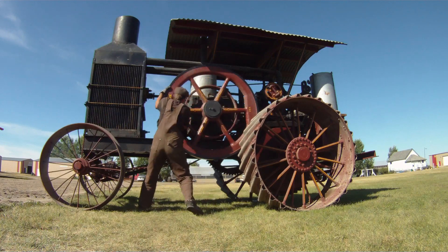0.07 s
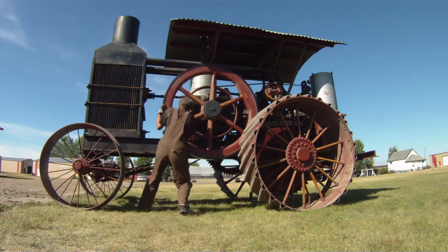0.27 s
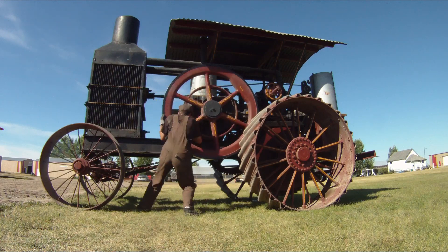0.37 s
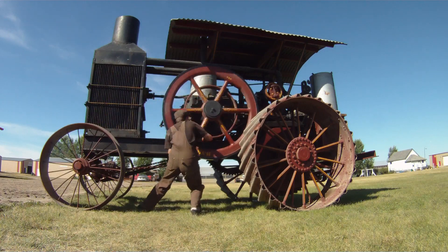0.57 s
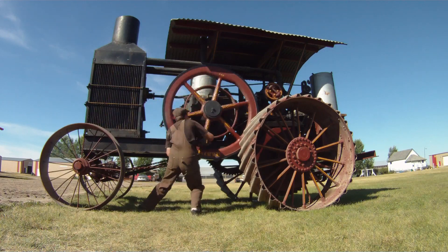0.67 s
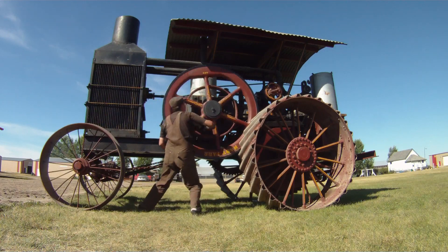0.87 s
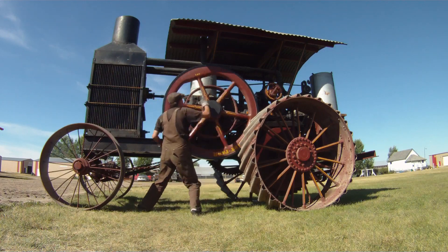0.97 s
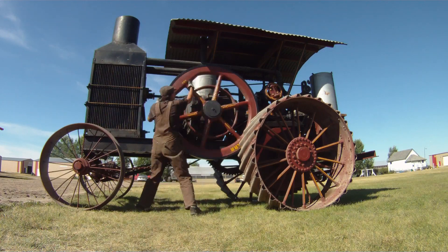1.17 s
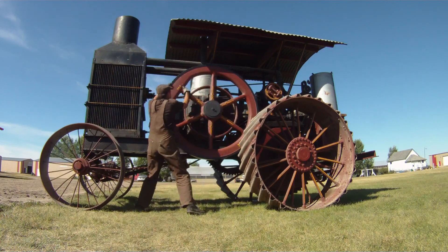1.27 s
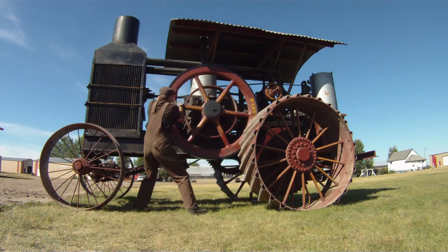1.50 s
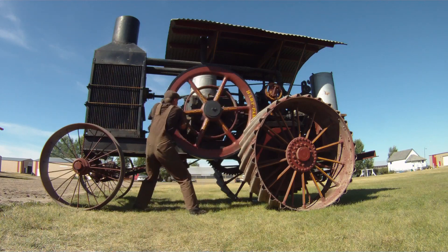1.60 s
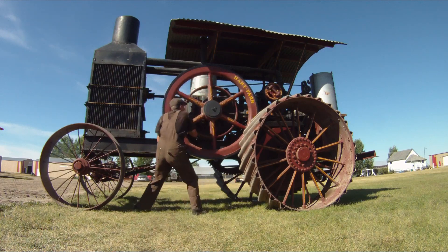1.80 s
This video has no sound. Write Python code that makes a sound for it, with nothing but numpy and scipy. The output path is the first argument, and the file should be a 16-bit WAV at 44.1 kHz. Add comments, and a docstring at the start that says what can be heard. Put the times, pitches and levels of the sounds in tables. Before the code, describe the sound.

A single ringing metal clank from an old tractor's hand-turned flywheel, with light wind.

```python
"""An old tractor's flywheel is pulled round by hand in the open, amid shuffling feet and light wind.
One clank is dying away when, at 0.2 s, the steel trip lever snaps over again: its modes ring, the iron
frame shakes, and a deep throb and a dull knock follow. Wind bumps the microphone twice. Near 0.9 s the
lever rubs on its cam; later the linkage ticks and the frame knocks faintly. Throughout, a camera's
coarse sampling mirrors the ring into the high treble."""
import sys
import numpy as np
from scipy import signal
from scipy.fft import rfft, irfft, next_fast_len
from scipy.io import wavfile
from scipy.ndimage import map_coordinates

SR = 44100
rng = np.random.default_rng(int(sys.argv[2]) if len(sys.argv) > 2 else 0)


def dump_mix(stems):
    """Bounce the given channels to the path in sys.argv[1] as a 16-bit WAV at rate SR."""
    frames = np.atleast_2d(stems).T  # one column per channel
    limited = np.clip(frames, -1, 1)  # hard clip at full scale
    pcm = np.round(limited * 32767).astype(np.int16)
    wavfile.write(sys.argv[1], SR, pcm)


N = 81585

# hiss of the open air: t/s, level/dB
AIR_LEVEL = [(0, -58.5), (.35, -60.5), (.52, -58.5), (.65, -61), (.9, -60.5), (1.05, -61), (1.36, -60.5),
             (1.45, -59), (1.65, -60), (1.85, -59)]
# its spectrum: f/Hz, relative density/dB
AIR_SPECTRUM = [(100, 7), (600, -9), (1000, -5), (1600, -6), (2400, -5), (3200, -8.5), (4200, -11.5),
                (5500, -12.5)]
# wind rumble on the microphone: t/s, level/dB
GUST_LEVEL = [(0, -56), (.15, -51), (.19, -46), (.255, -31.5), (.31, -38), (.36, -45), (.42, -34.5),
              (.47, -39.5), (.54, -44.5), (.63, -48.5), (.76, -49.5), (.99, -53), (1.09, -47.5),
              (1.22, -53), (1.33, -45.5), (1.42, -52.5), (1.85, -50.5)]
# its spectrum: f/Hz, relative density/dB
GUST_SPECTRUM = [(12, -9.5), (33, -4), (52, -3.5), (80, 0), (110, -6), (160, -9.5), (250, -44), (600, -48),
                 (1500, -93)]
# single pressure pulses of wind: t/s, level/dB, width/s
BUFFETS = [(0.2625, -27.5, 0.0019), (0.46, -30.5, 0.0064)]
# feet on grass and the rolling flywheel together: t/s, level/dB
SHUFFLE_LEVEL = [(0, -44.5), (.11, -50.5), (.19, -49.5), (.26, -42), (.36, -50.5), (.5, -52), (.59, -52),
                 (.65, -51.5), (.77, -53), (.84, -53.5), (.89, -50.5), (.97, -50.5), (1.04, -55.5),
                 (1.13, -49.5), (1.25, -53.5), (1.33, -53), (1.43, -54.5), (1.56, -53.5), (1.59, -50),
                 (1.66, -53.5), (1.85, -50.5)]
# their spectrum: f/Hz, relative density/dB
SHUFFLE_SPECTRUM = [(60, -6.5), (140, -4), (245, 1), (380, -6.5), (570, -4), (760, -15.5), (1100, -23),
                    (2500, -43.5)]
# ticks of loose linkage: t/s, noise level/dB, noise T60/s, ping level/dB
TICKS = [(0.1402, -46, 0.018, -75.5), (1.3258, -50, 0.019, -53)]
# spectrum of their noise: f/Hz, relative density/dB
TICK_SPECTRUM = [(400, -1), (1200, -10), (2000, 5.5), (3100, 6), (3900, -23), (5500, -33)]
# rubs of the lever: t/s, duration/s, upper tone level/dB, lower tone level/dB
RUBS = [(.082, 0.022, -52.5, -75), (0.817, 0.018, -51.5, -65), (.878, 0.023, -54, -51),
        (0.927, 0.049, -57, -55)]
# dry friction of the lever on its cam: f/Hz, relative density/dB
SCRAPE_SPECTRUM = [(300, -10.5), (560, -0.5), (850, -0.5), (1100, -11), (1600, -25), (2200, -17),
                   (3000, -24.5)]
# soft knocks of the frame: t/s, gain/dB, T60/s
KNOCKS = [(.313, -31, 0.073), (1.577, -65, 0.076)]
# their spectrum: f/Hz, relative density/dB
KNOCK_SPECTRUM = [(100, -3), (300, -24), (580, 15.5), (720, 4.5), (1100, -33.5), (2500, -47)]
# low resonances of the engine: f/Hz, gain/dB, T60/s
ENGINE_MODES = [(34, -32, 1), (69.4, -27.5, 0.22), (92.3, -49, 0.37)]
# blows of the trip lever: t/s, gain/dB
CLANKS = [(-.052, -11), (0.215, -8.5)]
# modes of the lever and its mounting: f/Hz, relative level/dB, T60/s
LEVER_MODES = [(574, -32.5, 0.68), (696.6, -37, 0.54), (753, -26, 0.066), (1104, -12.5, 0.046),
               (1143, -22.5, .2), (1175, -31.5, 0.11), (1236, -35.5, .17), (1324, -33, 0.14),
               (1445, -22.5, 0.12), (1862, -32, 0.18), (2205, 0.5, 0.11), (2130, -29.5, 0.32),
               (2326, -43, 0.32), (3558, -37.5, 0.11), (4090, -45.5, 0.1), (5075, -39.5, 0.21),
               (5160, -42, 0.13)]
# dense ringing of the iron frame: f/Hz, relative density/dB
FRAME_SPECTRUM = [(150, 2), (450, -13.5), (750, 3.5), (920, -11.5), (1120, 3.5), (1430, -4), (1620, -17),
                  (1860, -3), (2250, -13), (2600, -16.5), (3500, -19), (4500, -35), (5500, -34.5)]
# low-pass response ahead of the sampler: f/Hz, gain/dB
INPUT_FILTER = [(20, -1.5), (5100, -1), (5500, -6), (5950, -13.5)]


def amp(db):
    """Amplitude ratio: a factor of ten per 20 dB."""
    return 10 ** (np.asarray(db) / 20)


def unit(x):
    """Normalisation to an rms of 1."""
    return x / np.sqrt(np.mean(x ** 2) + 1e-20)


def gain_at(points, hz):
    """Frequency response: decibels interpolated over log frequency, returned as gain."""
    f, db = np.transpose(points)
    return amp(np.interp(np.log(hz + 1), np.log(f + 1), db))


def clock():
    """Uniform sampling: t/s of every sample."""
    return np.arange(N) / SR


def envelope(points):
    """Amplitude envelope: decibels interpolated over time, returned as gain."""
    return amp(np.interp(clock(), *np.transpose(points)))


def wobble(knots_per_s):
    """Random modulation: a spline through Gaussian values."""
    return map_coordinates(rng.standard_normal(1024), [clock() * knots_per_s], mode="wrap")


def filtered(x, response):
    """Linear filtering: the spectrum of x times a frequency response."""
    size = next_fast_len(N + SR // 2)
    hz = np.fft.rfftfreq(size, 1 / SR)
    return irfft(rfft(x, size) * response(hz), size)[:N]


def noise(spectrum):
    """Spectral shaping of white noise, at an rms of 1."""
    return unit(filtered(rng.standard_normal(N), lambda hz: gain_at(spectrum, hz)))


def decay(t60):
    """Exponential damping: 60 dB lost in t60 seconds."""
    return np.exp(-np.log(1000) * clock() / t60)


def rise(tau_s):
    """First-order build-up with time constant tau_s."""
    return 1 - np.exp(-clock() / tau_s)


def placed(x, start):
    """Time shift of x by start seconds, which may be negative."""
    k = int(round(start * SR))
    return np.pad(x, (max(k, 0), max(-k, 0)))[max(-k, 0):][:N]


def wind():
    """Turbulent pressure on the microphone: a rumble and two bumps, over the hiss of open air."""
    rumble = envelope(GUST_LEVEL) * noise(GUST_SPECTRUM)
    hiss = envelope(AIR_LEVEL) * amp(0.505 * wobble(11.63)) * noise(AIR_SPECTRUM)
    out = rumble + hiss
    for centre, db, width in BUFFETS:
        u = (clock() - centre) / width
        out += amp(db) * (1 - u ** 2) * np.exp(-u ** 2 / 2)
    return out


def shuffle():
    """Friction and rolling noise: feet and flywheel make one dull, uneven sound."""
    uneven = noise(SHUFFLE_SPECTRUM) * amp(1.6 * wobble(25.41))
    return envelope(SHUFFLE_LEVEL) * unit(uneven)


def linkage_ticks(ping_hz=1172):
    """Backlash: slack in the linkage closes with a dry tick and a slight ping."""
    ping = np.sin(2 * np.pi * ping_hz * clock()) * decay(t60=0.07)
    out = np.zeros(N)
    for start, db, t60, ping_db in TICKS:
        tick = amp(db) * noise(TICK_SPECTRUM) * decay(t60)
        out += placed(tick + amp(ping_db) * ping, start)
    return out


def lever_rubs(upper_hz=2200, lower_hz=1200, waver_hz=30.5, scrape_s=0.87, scrape_width_s=0.073):
    """Sliding friction: the lever scrapes on its cam, and two of its resonances sing briefly."""
    t = clock()
    scrape_swell = np.exp(-((t - scrape_s) / scrape_width_s) ** 2 / 2)
    out = amp(-58) * noise(SCRAPE_SPECTRUM) * scrape_swell
    tone = lambda hz: np.sin(2 * np.pi * np.cumsum(hz + waver_hz * wobble(200)) / SR)
    for start, duration, upper_db, lower_db in RUBS:
        swell = np.sin(np.pi * np.clip((t - start) / duration, 0, 1))
        out += swell * (amp(upper_db) * tone(upper_hz) + amp(lower_db) * tone(lower_hz))
    return out


def frame_knocks():
    """Soft impact: the iron frame responds with a gradual onset and little treble."""
    out = np.zeros(N)
    for start, db, t60 in KNOCKS:
        knock = noise(KNOCK_SPECTRUM) * decay(t60) * rise(tau_s=0.011)
        out += amp(db) * placed(knock, start)
    return out


def damped_modes(modes):
    """Modal superposition: free vibration as a sum of decaying sinusoids."""
    return sum(amp(db) * decay(t60) * np.sin(2 * np.pi * hz * clock()) for hz, db, t60 in modes)


def engine_throb():
    """Resonance: the engine's low modes swell just after the clank."""
    return placed(damped_modes(ENGINE_MODES) * rise(tau_s=0.021), start=0.224)


def with_yard_scatter(x):
    """Scattering: canopy, wheels and sheds add a weak, late tail to the direct sound."""
    tail = placed(rng.standard_normal(N) * decay(t60=1), start=0.03)
    return x + amp(-36.5) * signal.fftconvolve(x, tail / np.linalg.norm(tail))[:N]


def lever_clanks(touch_lead_s=0.0022):
    """Impact excitation: the lever touches, then slams home, ringing its own modes and the frame's."""
    ring = damped_modes(LEVER_MODES)
    out = np.zeros(N)
    for start, db in CLANKS:
        frame = amp(-18) * noise(FRAME_SPECTRUM) * decay(t60=0.16)  # modes so dense they act as noise
        blow = (ring + frame) * rise(tau_s=0.0029)
        touch_frame = amp(-7.5) * noise(FRAME_SPECTRUM)
        touch = amp(-20.5) * (ring + touch_frame) * decay(t60=0.052)
        out += amp(db) * placed(touch, start - touch_lead_s)
        out += amp(db) * placed(with_yard_scatter(blow), start)
    return out


def scene():
    """Linear superposition: the pressures of all sources add at one microphone."""
    tractor = lever_clanks() + engine_throb() + frame_knocks() + lever_rubs() + linkage_ticks()
    return (tractor + shuffle() + wind())[None]


def record(dry, hold_hz=12000, top_hz=15300):
    """Spectral imaging: the camera's sample-and-hold mirrors the sound about its sampling rate."""
    band = filtered(dry[0], lambda hz: gain_at(INPUT_FILTER, hz) * (hz < hold_hz / 2))
    mirrored = band * (1 + 2 * amp(0.5) * np.cos(2 * np.pi * hold_hz * clock()))
    # holding each value makes the treble droop as a sinc
    return filtered(mirrored, lambda hz: np.sinc(hz / hold_hz) * (hz < top_hz))[None]


dry = scene()
out = record(dry)
dump_mix(out)
```